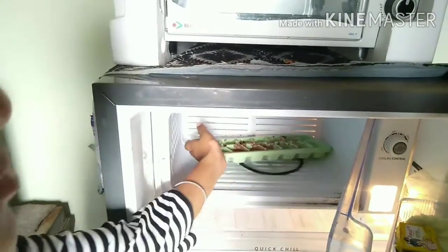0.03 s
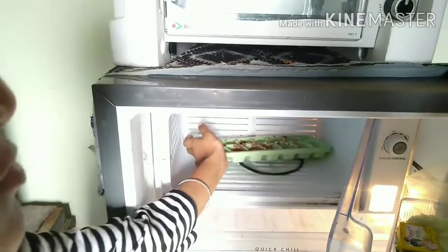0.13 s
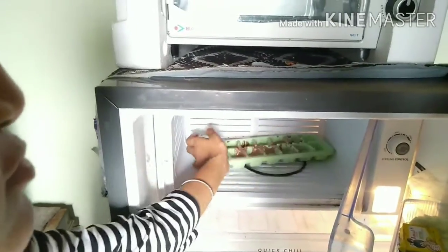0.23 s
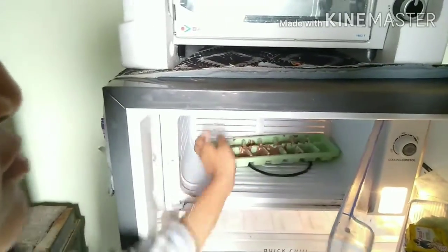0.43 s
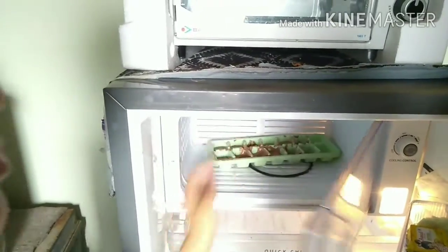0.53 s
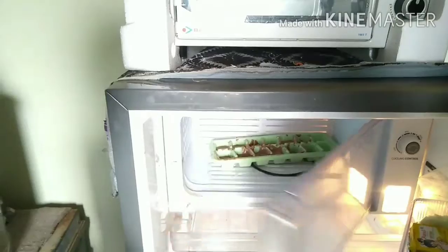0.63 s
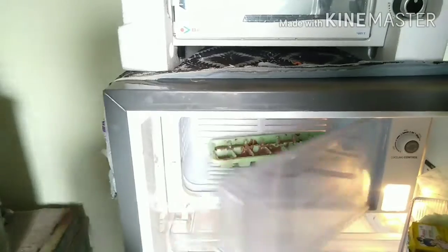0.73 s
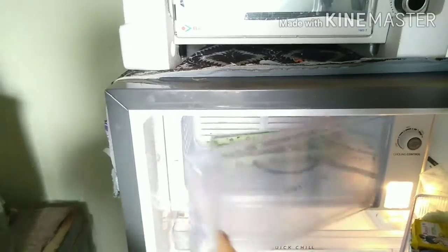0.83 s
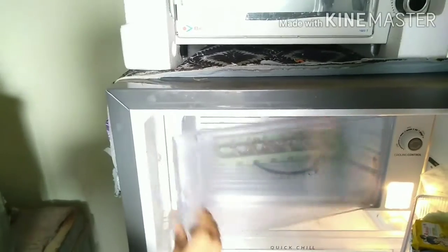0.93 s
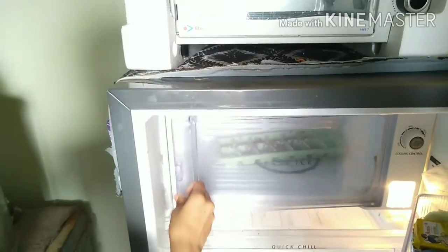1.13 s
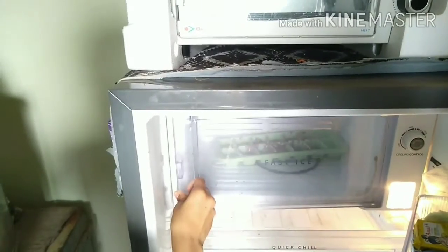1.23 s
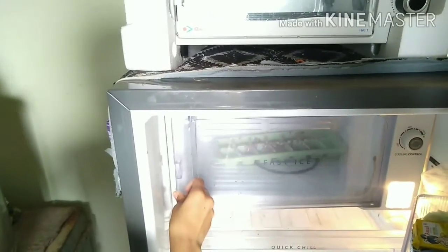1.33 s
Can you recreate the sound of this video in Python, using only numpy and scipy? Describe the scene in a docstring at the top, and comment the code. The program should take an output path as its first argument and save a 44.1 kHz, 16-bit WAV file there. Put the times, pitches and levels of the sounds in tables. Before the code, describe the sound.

A plastic ice tray lightly touches a freezer floor at 0.18 seconds, then clatters loudest at 0.21 and rattles to rest by 0.4. A very faint hinge tone rubs from 0.6, with tiny ticks and a thin squeal near 1.03. The flap knocks shut at 1.15-1.18; its catch begins clicking at 1.385. Hard kitchen echoes, quiet fridge hum and hiss, bright phone microphone.

```python
"""An ice tray touches the plastic floor of a freezer box and rattles to rest: blows ring damped modes and crack.
A plastic flap swings on a faintly singing hinge, knocks shut and its catch starts to snap in, struck the same way.
Small ticks are bursts of narrow noise. A hard-walled kitchen adds dense noise echoes after the blows.
Beneath lie a quiet fridge hum and hiss of shaped noise and a narrow high hiss; a phone microphone colours it all."""
import sys
import numpy as np
from scipy import signal
from scipy.fft import rfft, irfft, next_fast_len
from scipy.io import wavfile
from scipy.ndimage import uniform_filter1d, map_coordinates

SR = 44100
rng = np.random.default_rng(int(sys.argv[2]) if len(sys.argv) > 2 else 0)


def voltage_ratio(decibels):
    """Convert decibels (scalar or array-like) to amplitude ratios, 20 dB per decade."""
    exponent = np.asarray(decibels, float) / 20
    return 10 ** exponent


def int16_out(signal):
    """Quantize to a 16-bit WAV file."""
    q = np.round(np.clip(np.atleast_2d(signal).T, -1, 1) * 32767)
    wavfile.write(sys.argv[1], SR, q.astype(np.int16))


N = 61739


def unit(x):
    """Scale to rms 1."""
    return x / np.sqrt(np.mean(x ** 2))


def colour(x, points):
    """Filter by (Hz, dB) points joined over log frequency."""
    p, size = np.array(points, float), next_fast_len(len(x))
    hz = np.arange(size // 2 + 1) * SR / size + 1
    gain_db = np.interp(np.log(hz), np.log(p[:, 0]), p[:, 1])
    return irfft(rfft(x, size) * voltage_ratio(gain_db), size)[:len(x)]


def fall(t, t60_s):
    """Exponential decay from t = 0, 60 dB down after t60_s."""
    return (t >= 0) * np.exp(-np.log(1000) * np.maximum(t, 0) / t60_s)


def walk(rate_hz):
    """Random levels, rate_hz per second, joined by ramps; rms about 0.54."""
    hold = int(SR / rate_hz)
    steps = np.repeat(rng.standard_normal(N // 50), hold)[:N]
    return uniform_filter1d(steps, hold) * 0.66


def band_noise(low_hz, high_hz, length):
    """White noise through a band-pass."""
    sos = signal.butter(2, [low_hz, high_hz], "band", fs=SR, output="sos")
    return signal.sosfilt(sos, rng.standard_normal(length))


def struck(blows, modes, cracks, crack_colour):
    """Short pushes excite decaying modes, each with its own scatter; noise bursts add the cracks."""
    rise_cycles = 0.49  # low modes swell more slowly
    most_cycles, short_s = 45, 0.07  # t60 is capped at the longer of these two
    scatter_db, detune_ratio = 1.5, 0.02
    crack_rise_s = 0.001
    t, tau = np.arange(N) / SR, np.arange(SR // 4) / SR
    m, out = np.array(modes, float), np.zeros(N)
    hz, mode_db = m[:, :1], m[:, 1]
    fades = np.array([fall(tau, min(t60_s, max(most_cycles / f, short_s))) for f, _, t60_s in m])
    fades = fades * (1 - np.exp(-tau * hz / rise_cycles))
    signs = (-1) ** np.arange(len(m))
    loudest_db = max(blow[1] for blow in blows)
    for start_s, db, push_ms in blows:
        level_scatter = scatter_db * rng.standard_normal(len(m))
        pitch_scatter = detune_ratio * rng.standard_normal((len(m), 1))
        pitch_scatter = pitch_scatter * (db < loudest_db)  # the loudest blow stays in tune
        rings = fades * np.sin(2 * np.pi * hz * (1 + pitch_scatter) * tau)
        ring = (voltage_ratio(db + mode_db + level_scatter) * signs) @ rings
        push = np.hanning(int(push_ms * SR / 1000) + 3)
        i = int(start_s * SR)
        out[i:i + len(tau)] += signal.lfilter(push / push.sum(), 1, ring)[:N - i]
    grit = unit(colour(rng.standard_normal(N), crack_colour))
    for start_s, db, t60_s in cracks:
        rise = np.clip((t - start_s) / crack_rise_s, 0, 1)
        out += voltage_ratio(db) * grit * fall(t - start_s, t60_s) * rise
    return out


def tone(curve, waver_ratio, flicker_db):
    """Sines in harmonic ratio follow a pitch curve; pitch wavers and each level flickers."""
    t, c = np.arange(N) / SR, np.array(curve, float)
    hz = np.interp(t, c[:, 0], c[:, 1]) * (1 + waver_ratio * walk(39.84))
    phase = 2 * np.pi * np.cumsum(hz) / SR
    out = np.zeros(N)
    for partial, level_db in enumerate(c[:, 2:].T, 1):
        db = np.interp(t, c[:, 0], level_db, left=-140, right=-140) + flicker_db * walk(29.1)
        out += np.sqrt(2) * voltage_ratio(db) * np.sin(partial * phase)
    return out


# Hum and hiss spectrum. Each row: frequency in Hz, density in dB per Hz.
HUM_COLOUR = [(13, -62), (22, -10.5), (132, 0), (151, -12), (183, 2.5), (255, -12), (300, -4.5),
              (493, -6.5), (725, -12.5), (787, -12.5), (1900, -16), (2120, -18.5), (4100, -27), (8160, -22),
              (15800, -42.5)]
# Level of the low hum. Each row: time in seconds, level in dB.
HUM_SWELL = [(0, -4), (.4, 0), (.8, -2.5), (1.1, -5), (1.4, 0.5)]


def hum():
    """Fridge hum and hiss: shaped noise whose part below 700 Hz swells a little."""
    level_db = -61.5  # rms before the swell
    x = unit(colour(rng.standard_normal(N), HUM_COLOUR))
    low = signal.sosfiltfilt(signal.butter(2, 700, fs=SR, output="sos"), x)
    swell_db = np.interp(np.arange(N) / SR, *np.array(HUM_SWELL, float).T) + 1.5 * walk(8)
    return voltage_ratio(level_db) * (x - low + low * voltage_ratio(swell_db))


# Faint high hiss. Each row: time in seconds, level in dB.
WHINE_LEVEL = [(0, -86), (0.301, -86), (.6, -82.5), (0.721, -91), (.85, -87), (1.0, -112)]


def whine():
    """A narrow band of noise that comes and goes."""
    centre_hz, width_hz = 11960, 140
    x = unit(band_noise(centre_hz - width_hz / 2, centre_hz + width_hz / 2, N))
    level_db = np.interp(np.arange(N) / SR, *np.array(WHINE_LEVEL, float).T)
    return x * voltage_ratio(level_db + 2.8 * walk(22.76))


# First touch of the tray corner. Each row: start in seconds, level in dB, push in ms.
TOUCH_BLOWS = [(.1778, -37, .1), (.191, -35, 2.5)]
# Its modes. Each row: frequency in Hz, level in dB, t60 in seconds before the cap.
TOUCH_MODES = [(215, -10, .09), (462, 0, .09), (665, -10, .04), (1000, -13, .04), (1180, -12, .04),
               (3500, -6, .07)]
# Its crack. Each row: start in seconds, level in dB, t60 in seconds.
TOUCH_CRACKS = [(0.1773, -36.5, 0.083)]
# Crack spectrum. Each row: frequency in Hz, density in dB per Hz.
TOUCH_CRACK_COLOUR = [(500, 6), (2000, -5), (4000, -8.5), (8000, -7.5), (12000, -26), (16000, -31)]


def tray_touch():
    """The tray corner meets the floor: two light blows on damped modes and a crack."""
    return struck(TOUCH_BLOWS, TOUCH_MODES, TOUCH_CRACKS, TOUCH_CRACK_COLOUR)


# Tray rattle. Each row: start in seconds, level in dB, push in ms.
TRAY_BLOWS = [(.2042, -40, 0.4), (.2092, -19, 0.3), (.2205, -28, 0.5), (.2305, -27, 1.2),
              (.2425, -24.5, 1.8), (.2560, -24, 2.27), (.2678, -28, .6), (.2825, -30, 0.7), (.3, -33, .8),
              (.33, -36, .7), (.36, -38, .7), (.39, -35, 2)]
# Tray and floor modes. Each row: frequency in Hz, level in dB, t60 in seconds before the cap.
TRAY_MODES = [(79, -18, 0.09), (124, -13, 0.1), (226, -14, 0.09), (318, -13, 0.05), (478, -5, 0.05),
              (532, -4, 0.075), (657, -11, 0.045), (790, -11, 0.045), (1080, 2, 0.055), (1170, 1, 0.045),
              (1430, -4, 0.055), (1570, -1, 0.03)]
# Tray cracks. Each row: start in seconds, level in dB, t60 in seconds.
TRAY_CRACKS = [(0.2036, -25.5, 0.023), (0.2092, -23.5, 0.082), (0.2196, -25.5, 0.06), (0.2437, -35.5, 0.23)]
# Crack spectrum. Each row: frequency in Hz, density in dB per Hz.
TRAY_CRACK_COLOUR = [(300, -25), (600, 0), (1150, -2.5), (1600, -4), (1850, -11), (4000, -19), (6100, -18),
                     (8500, -19), (13300, -39), (15200, -40)]


def tray():
    """The tray rattles to rest: a run of blows on damped plastic modes, with cracks."""
    return struck(TRAY_BLOWS, TRAY_MODES, TRAY_CRACKS, TRAY_CRACK_COLOUR)


# Kitchen echo bands. Each row: centre in Hz, t60 in seconds, level in dB.
KITCHEN_BANDS = [(96, 0.9, -3), (162, 0.4, -6.5), (348, 0.4, -6), (715, 0.54, -6.5), (1550, 0.6, -16.5),
                 (2546, 0.47, -7), (5660, 0.5, -34), (9700, .3, -10.5)]


def kitchen(x):
    """Hard walls: octave bands of decaying noise as echoes, evened in colour, after a short gap."""
    gap_s, rise_s, length_s = 0.006, 0.012, 0.9
    fine_hz, broad_hz = 24, 400  # a one-second echo has lines 1 Hz apart
    waver_s, waver_hz = 0.0003, 40
    t = np.arange(SR) / SR - gap_s
    echo = np.zeros(SR)
    for hz, t60_s, db in KITCHEN_BANDS:
        echo += voltage_ratio(db) * band_noise(hz / np.sqrt(2), hz * np.sqrt(2), SR) * fall(t, t60_s)
    lines = rfft(echo)
    fine, broad = (uniform_filter1d(np.abs(lines) ** 2, width) + 1e-12 for width in (fine_hz, broad_hz))
    echo = irfft(lines * np.sqrt(broad / fine), SR)
    rise = 1 - np.exp(-np.maximum(t, 0) / rise_s)
    echo = echo * rise * (t < length_s) / np.sqrt(SR / 100)
    wet = signal.fftconvolve(x, echo)[:N]
    # the echo delay wavers slightly at random, which blurs long rings
    return map_coordinates(wet, [np.arange(N) + waver_s * SR * walk(waver_hz)], mode="mirror")


# Small faint ticks. Each row: start in seconds, level in dB, centre in Hz, width in Hz, t60 in seconds.
TICKS = [(.511, -63, 6900, 1500, .045), (.512, -76, 12000, 500, .035), (.76, -59, 230, 60, .15),
         (.798, -61, 1650, 700, .12), (.805, -63, 1050, 600, .3), (1.047, -62, 7500, 2400, .06)]


def ticks():
    """Faint decaying bursts of band-passed noise."""
    t, out = np.arange(N) / SR, np.zeros(N)
    for start_s, db, hz, width_hz, t60_s in TICKS:
        noise = unit(band_noise(hz - width_hz / 2, hz + width_hz / 2, N))
        out += voltage_ratio(db) * noise * fall(t - start_s, t60_s)
    return out


# Hinge rubbing. Each row: time in seconds, pitch in Hz, level in dB, octave partial in dB.
HINGE_CURVE = [(.58, 353.6, -89, -95), (.63, 344.4, -69, -85), (.74, 345, -70, -85),
               (.79, 366.4, -71.5, -85), (.83, 385, -71, -72), (.9, 390, -73, -80), (.93, 400, -74, -71),
               (.99, 397, -75, -72), (1.02, 400, -70, -79), (1.09, 398, -67, -72), (1.15, 398.6, -74, -79)]


def hinge():
    """The hinge rubs as the flap swings: a wavering tone and its octave."""
    return tone(HINGE_CURVE, waver_ratio=0.0046, flicker_db=3.6)


# Thin squeal late in the swing. Each row: time in seconds, pitch in Hz, level in dB.
SQUEAL_CURVE = [(1.01, 1990, -85), (1.028, 1950, -64), (1.048, 1950, -72), (1.068, 1980, -65),
                (1.1, 1970, -73), (1.14, 1980, -79)]


def squeal():
    """A thin squeal near the end of the swing: one wavering sine."""
    return tone(SQUEAL_CURVE, waver_ratio=0.0157, flicker_db=1.8)


# Flap knocks. Each row: start in seconds, level in dB, push in ms.
FLAP_BLOWS = [(1.1478, -37, 0.12), (1.1515, -35, .2), (1.1560, -27, 0.45), (1.1772, -27.5, 1.3)]
# Flap modes. Each row: frequency in Hz, level in dB, t60 in seconds before the cap.
FLAP_MODES = [(113.5, -4.5, 0.048), (199.5, -7, 0.043), (478, 2.5, 0.038), (600, -7, 0.03),
              (1020, -10, 0.04), (1540, 2.5, .04), (1760, 1, 0.035), (2440, -4, 0.026), (3517, 6.5, 0.013)]
# Flap cracks. Each row: start in seconds, level in dB, t60 in seconds.
FLAP_CRACKS = [(1.1475, -31.5, 0.12), (1.162, -53, 0.11), (1.185, -44, 0.05)]
# Crack spectrum. Each row: frequency in Hz, density in dB per Hz.
FLAP_CRACK_COLOUR = [(300, -8), (1700, -6.5), (4700, -9.5), (5800, -18.5), (6800, -13.5), (8200, -13.5),
                     (10500, -40), (16000, -49)]


def flap():
    """The flap knocks shut: blows on short plastic modes, with cracks."""
    return struck(FLAP_BLOWS, FLAP_MODES, FLAP_CRACKS, FLAP_CRACK_COLOUR)


# Catch clicks. Each row: start in seconds, level in dB, push in ms.
CATCH_BLOWS = [(1.3850, -34, 0.13), (1.3880, -28.5, 0.7), (1.3910, -34.5, 0.42), (1.3940, -31, 0.32),
               (1.3965, -43, 0.61)]
# Catch modes. Each row: frequency in Hz, level in dB, t60 in seconds before the cap.
CATCH_MODES = [(221, -14, 0.24), (992, -11.5, 0.072), (1371, -5.5, 0.09), (1817, -7.5, 0.03)]
# Catch crack. Each row: start in seconds, level in dB, t60 in seconds.
CATCH_CRACKS = [(1.3835, -45.5, 0.26)]
# Crack spectrum. Each row: frequency in Hz, density in dB per Hz.
CATCH_CRACK_COLOUR = [(800, 4.5), (2000, -8), (5000, -16.5), (6800, -7.5), (10000, -21.5), (16000, -29)]


def catch():
    """The catch starts to snap in: close-set blows on its modes and a crack."""
    return struck(CATCH_BLOWS, CATCH_MODES, CATCH_CRACKS, CATCH_CRACK_COLOUR)


def scene():
    """Blows and ticks with their room echo; hinge, squeal, hiss and hum get none."""
    radiates_above_hz = 131.7
    hits = tray_touch() + tray() + flap() + catch()
    hits = signal.sosfilt(signal.butter(3, radiates_above_hz, "high", fs=SR, output="sos"), hits)
    hits = hits + ticks()
    faint = hinge() + squeal() + whine()
    return (hits + kitchen(hits) + faint + hum())[None]


def top_cut(x):
    """Nothing passes above the cut-off."""
    return signal.sosfilt(signal.butter(12, 16780, fs=SR, output="sos"), x)


# Microphone response. Each row: frequency in Hz, gain in dB.
MIC_COLOUR = [(20, 9.5), (60, 3.5), (10000, 0), (13300, 9), (15200, 15), (16000, 22)]


def record(dry):
    """Phone microphone: lifted lows and a strong treble rise, then a steep low-pass."""
    top_hz = 15830
    low_pass = signal.ellip(10, 0.2, 80, top_hz, fs=SR, output="sos")
    mix = signal.sosfilt(low_pass, colour(dry[0], MIC_COLOUR))
    return top_cut(mix[None])


dry = scene()
out = record(dry)
int16_out(out)
```